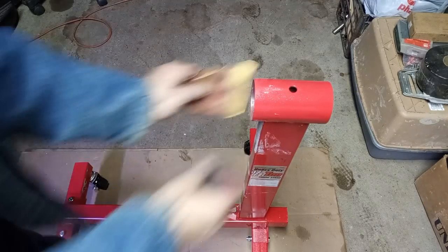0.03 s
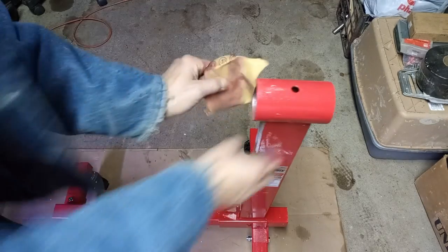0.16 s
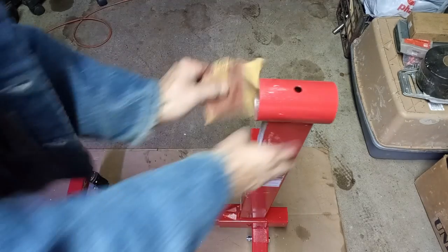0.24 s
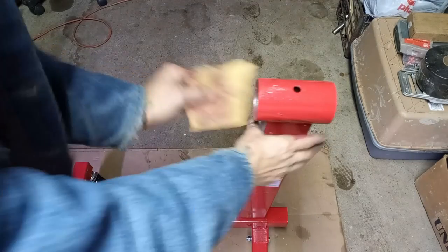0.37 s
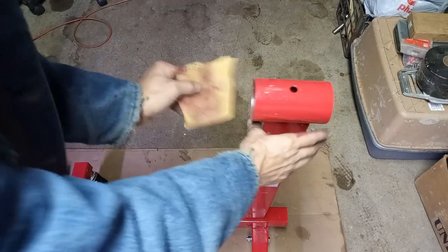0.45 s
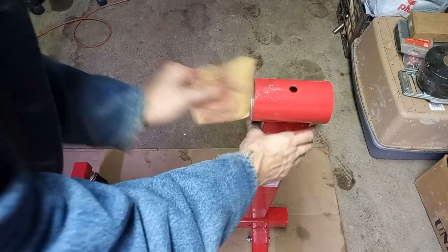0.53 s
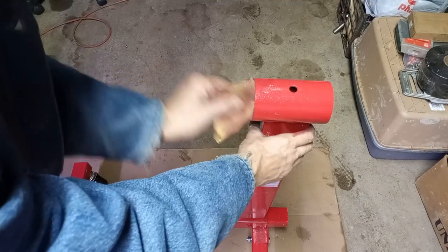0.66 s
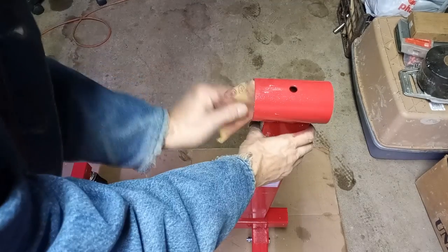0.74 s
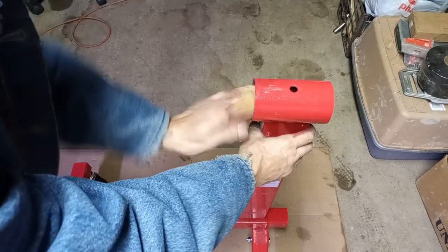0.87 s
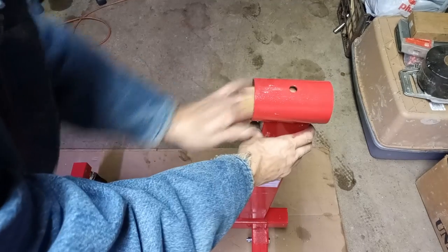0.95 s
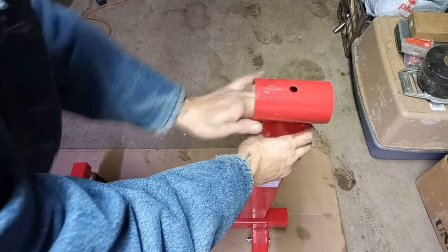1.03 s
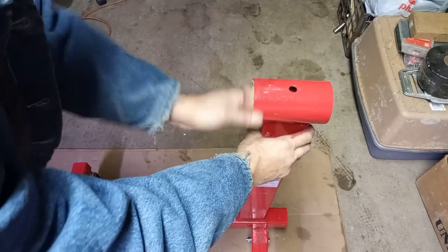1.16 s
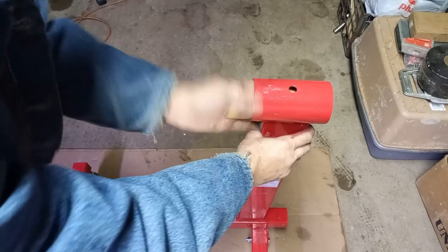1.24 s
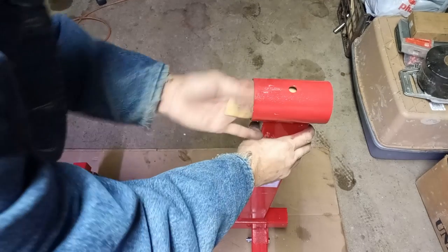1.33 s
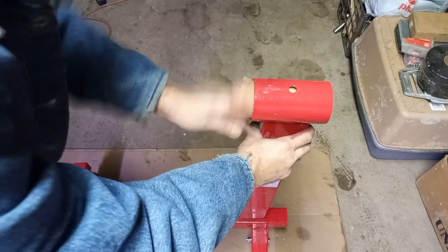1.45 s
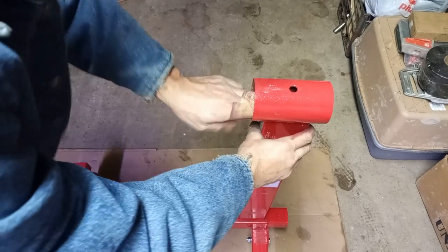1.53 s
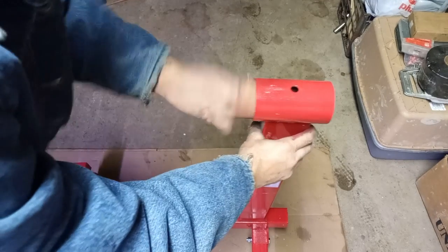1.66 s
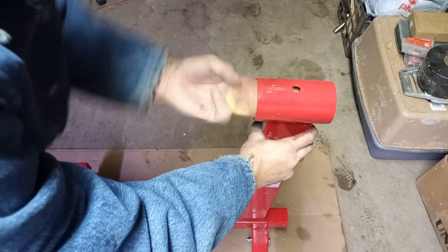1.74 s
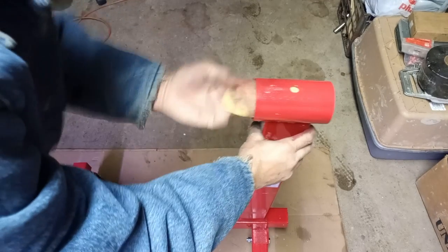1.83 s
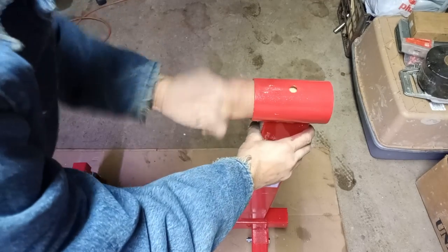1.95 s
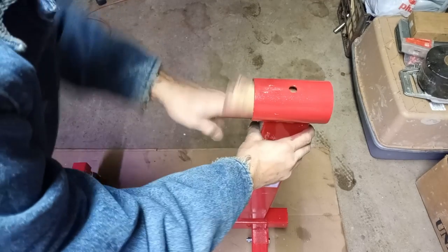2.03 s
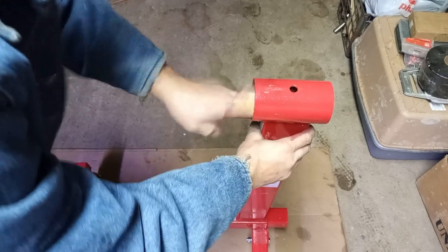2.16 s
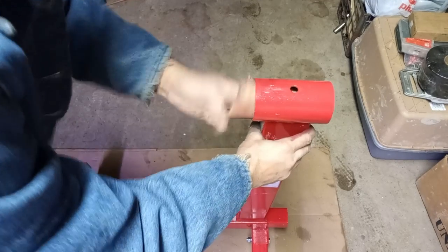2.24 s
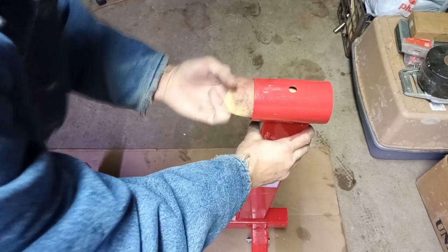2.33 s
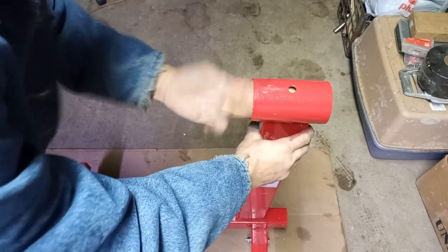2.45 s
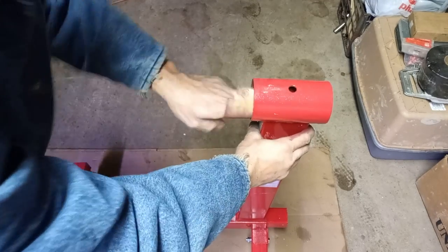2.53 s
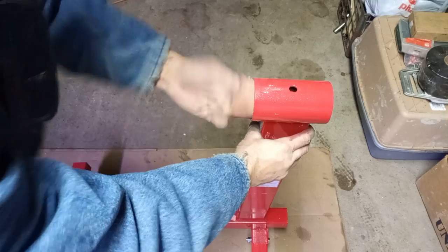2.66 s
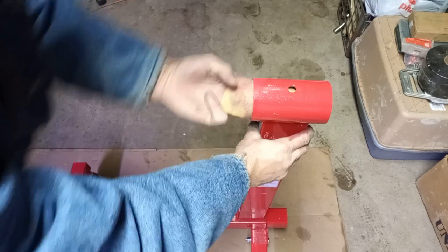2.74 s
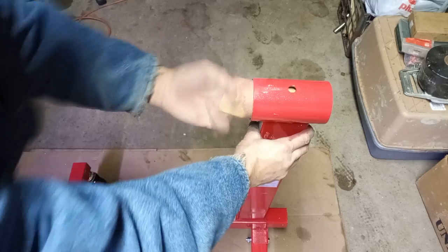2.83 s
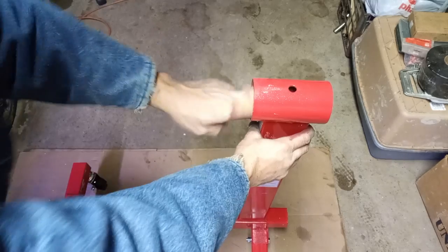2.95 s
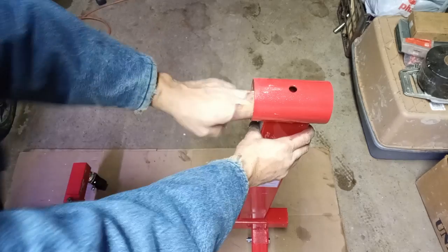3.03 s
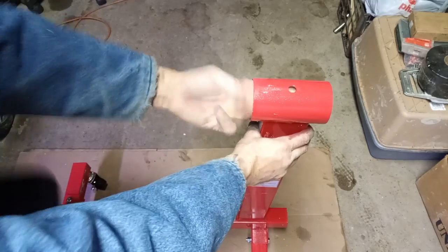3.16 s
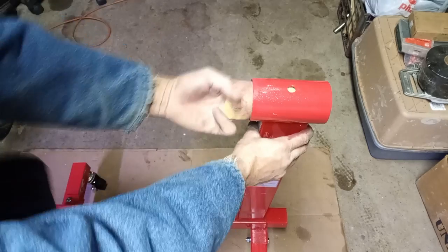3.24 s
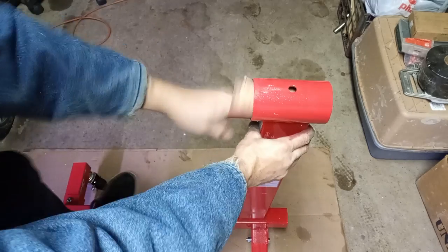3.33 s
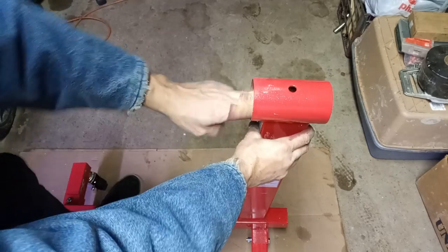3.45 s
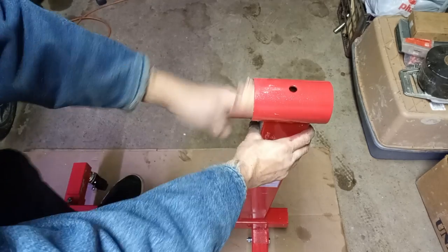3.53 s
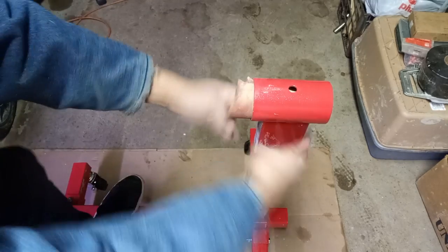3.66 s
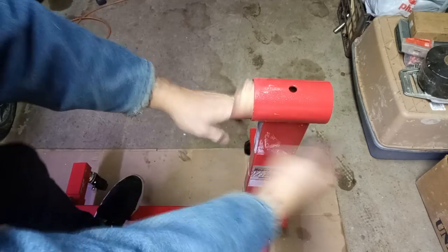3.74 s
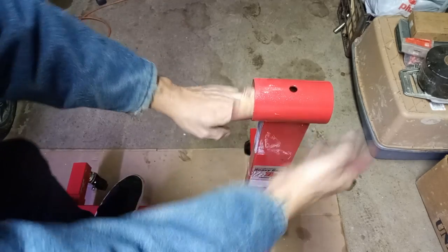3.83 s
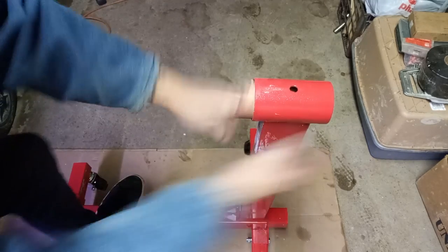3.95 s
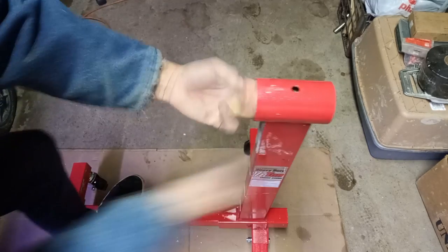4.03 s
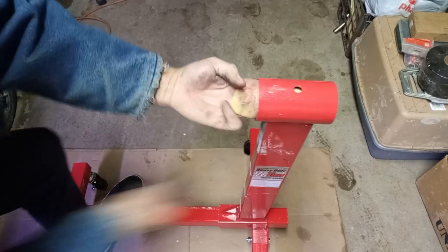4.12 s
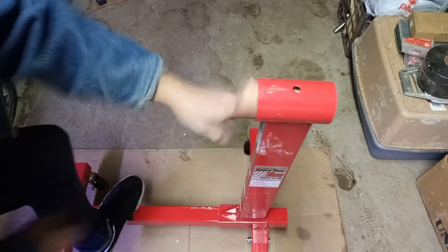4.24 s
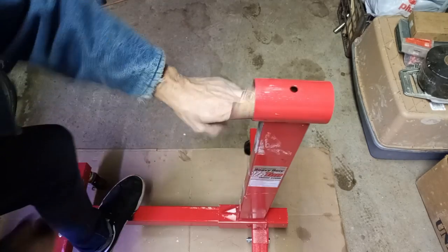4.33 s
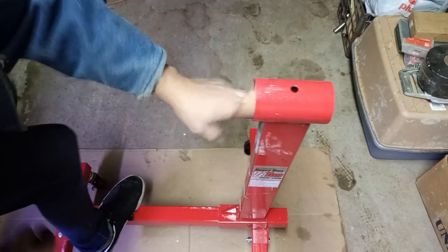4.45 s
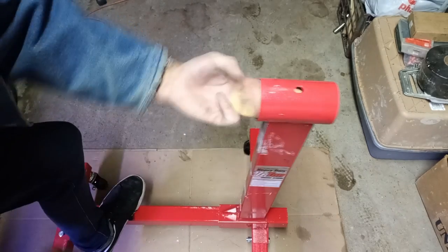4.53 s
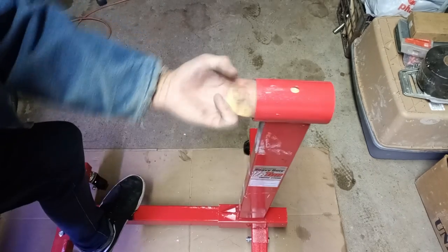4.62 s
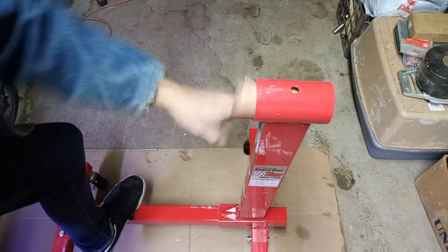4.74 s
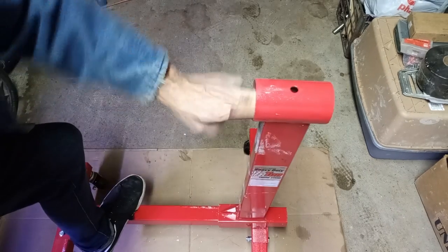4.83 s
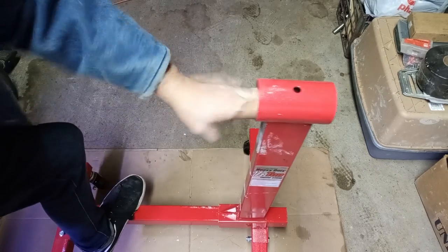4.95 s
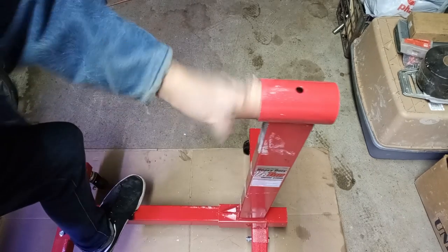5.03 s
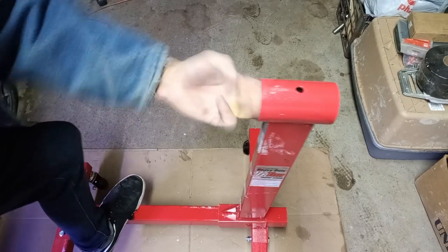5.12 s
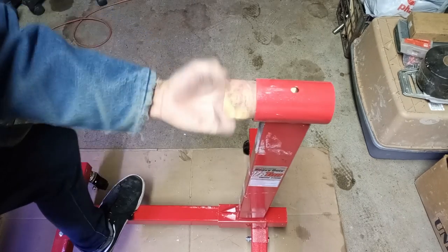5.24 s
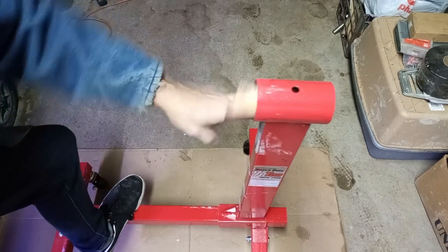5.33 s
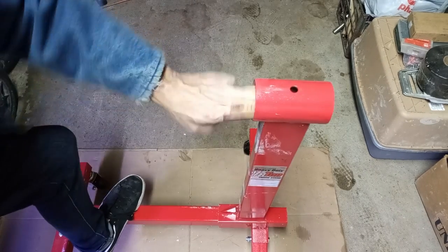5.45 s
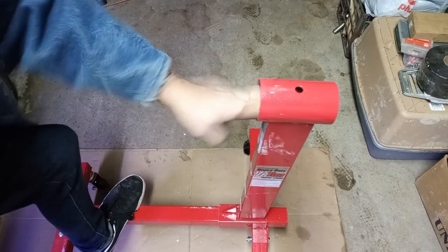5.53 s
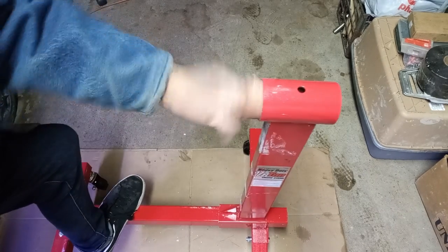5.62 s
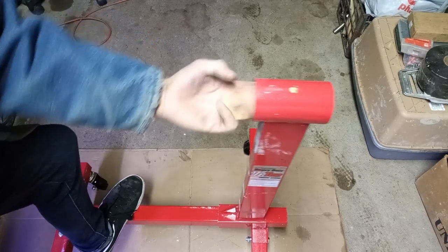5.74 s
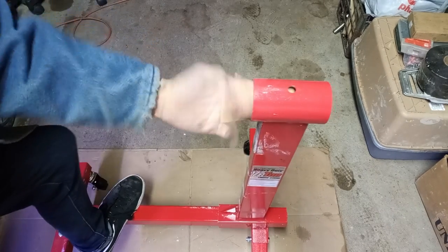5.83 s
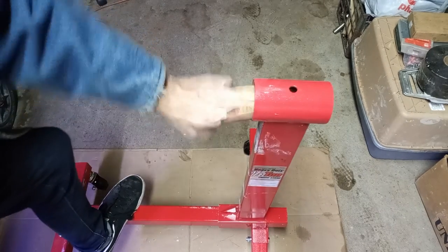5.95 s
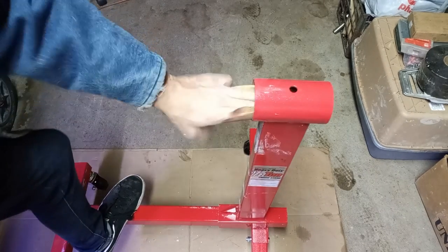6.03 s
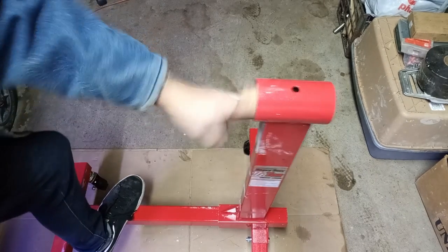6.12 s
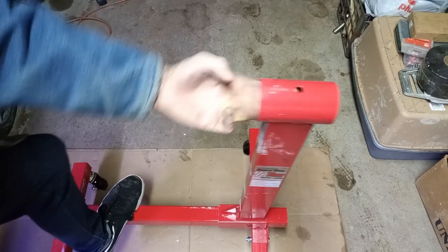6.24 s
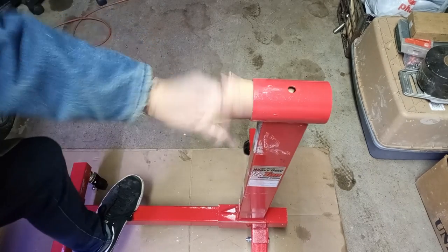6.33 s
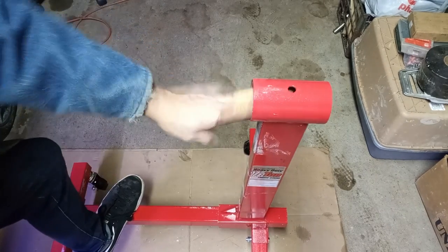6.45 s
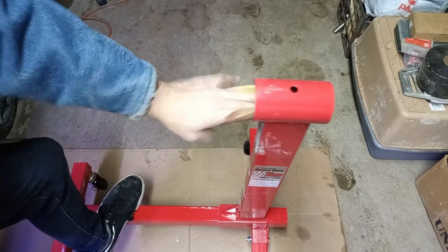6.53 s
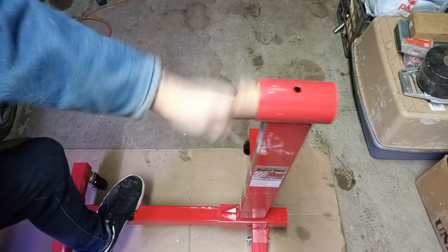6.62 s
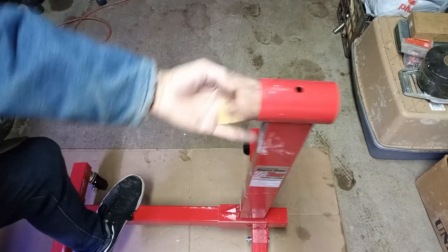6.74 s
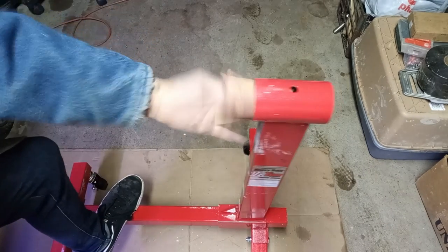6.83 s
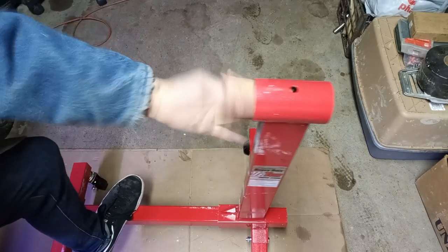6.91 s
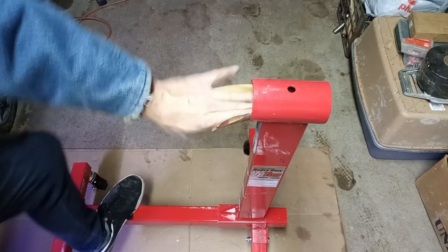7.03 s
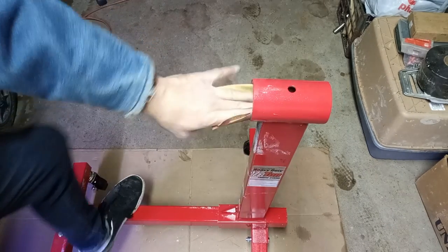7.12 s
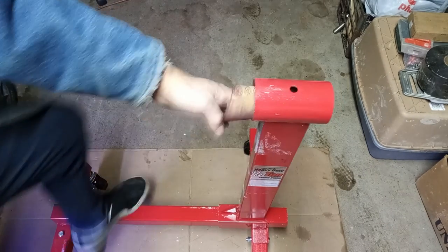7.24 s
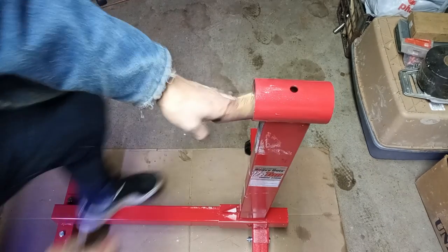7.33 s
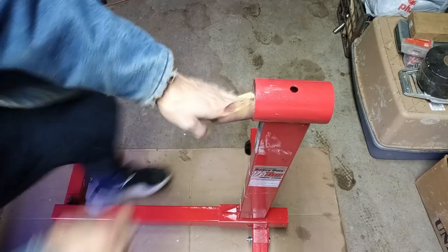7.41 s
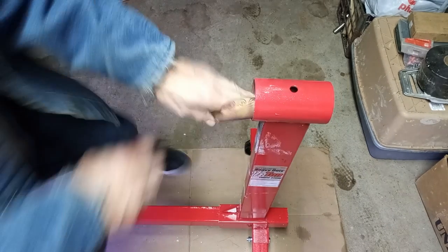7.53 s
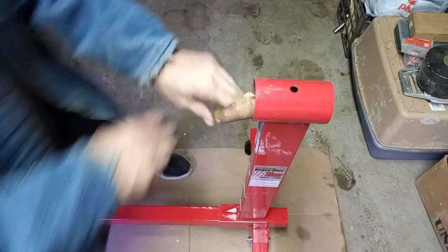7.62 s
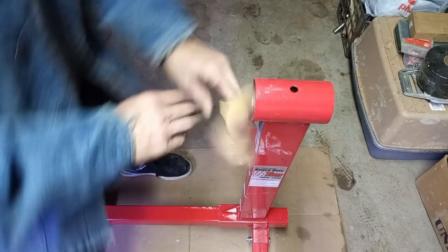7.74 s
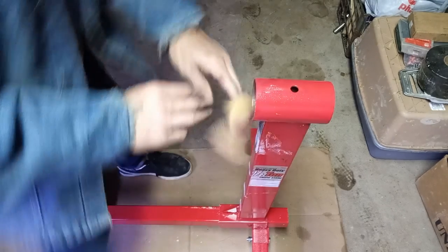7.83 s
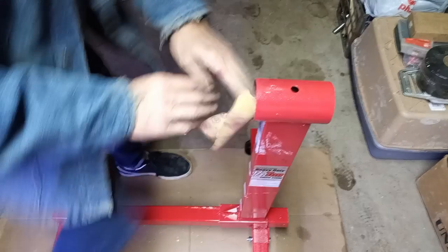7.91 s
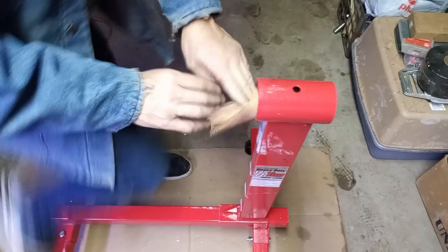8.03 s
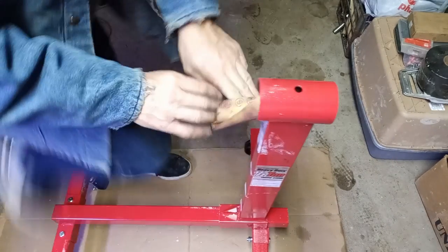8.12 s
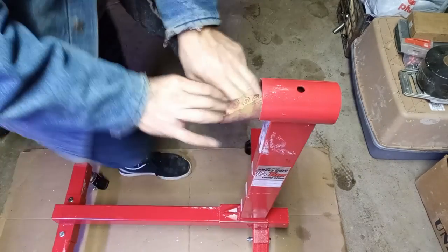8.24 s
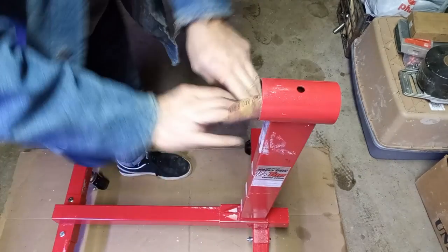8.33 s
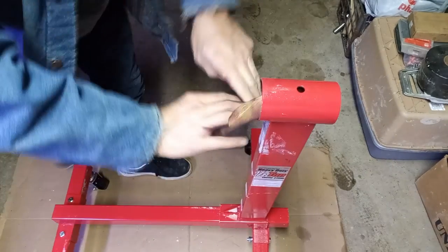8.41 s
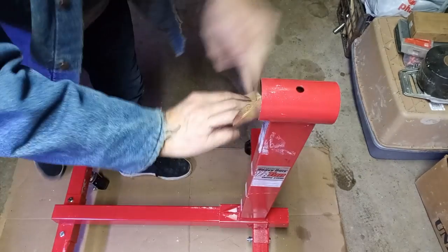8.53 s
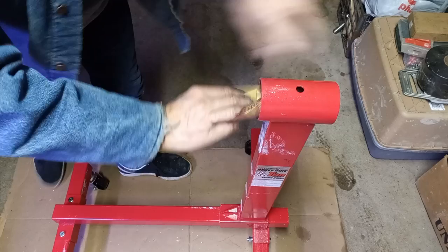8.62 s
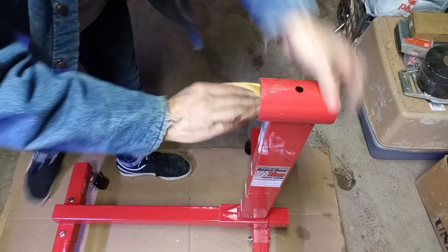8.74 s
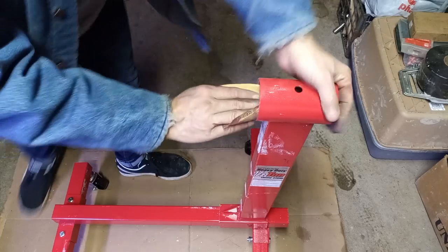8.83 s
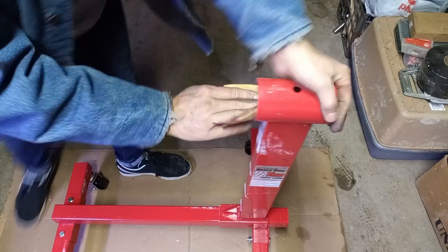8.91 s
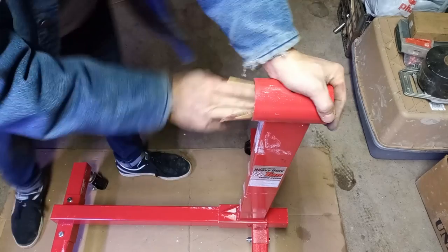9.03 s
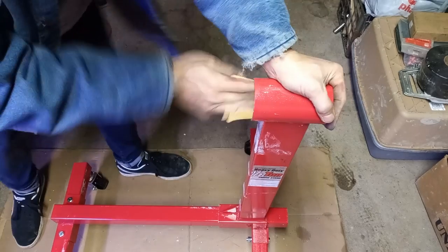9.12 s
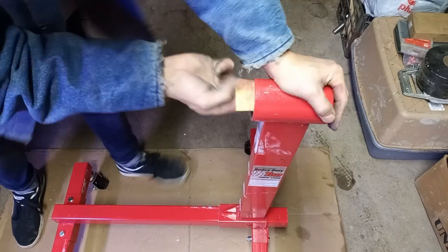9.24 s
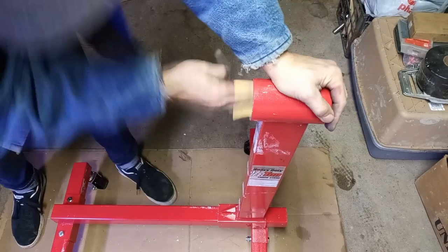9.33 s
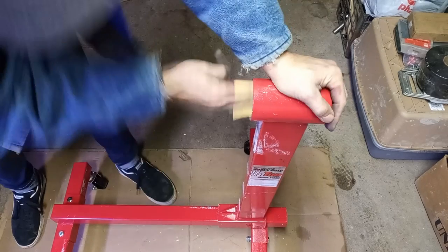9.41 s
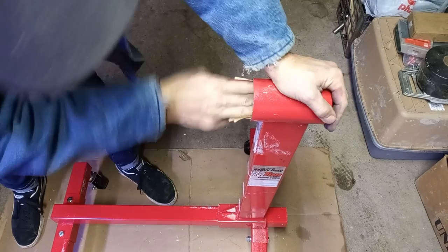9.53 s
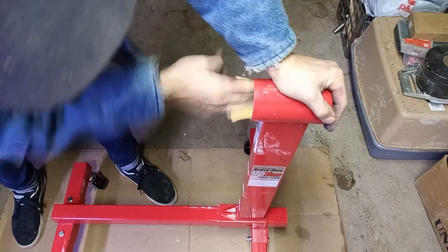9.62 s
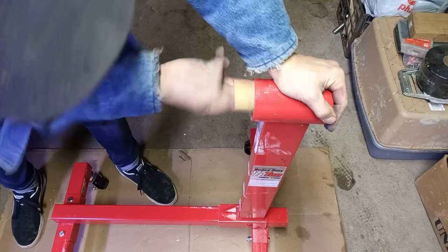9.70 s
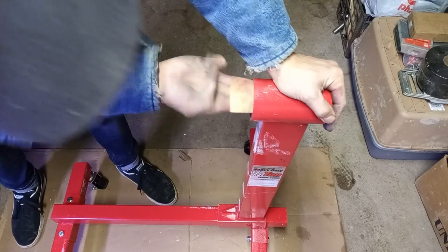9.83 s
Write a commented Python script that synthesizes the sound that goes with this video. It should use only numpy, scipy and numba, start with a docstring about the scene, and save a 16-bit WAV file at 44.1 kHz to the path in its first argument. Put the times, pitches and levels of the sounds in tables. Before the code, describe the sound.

Close up in a quiet garage, someone sands the inside of a steel tube by hand. After an opening snap, the sanding sponge rasps back and forth about four times a second, bright, gritty and slightly hollow. The rhythm breaks for uneven scuffs as the grip changes, then briefly resumes. Soft denim rustle and a faint low thrum from the stand lie underneath, all heard on the left only.

```python
"""A sharp snap and a little handling, then a sanding sponge scrubs in and out of the open steel tube on
top of a stand. Each stroke bites, pushes and fades; the grit hisses and blows the tube's air resonances.
Between a long run of strokes and a short one the sponge is folded and regripped. Denim sleeves rustle
and the stand thrums. In a garage, with one microphone close to the work, on the left channel only."""
import sys
import numpy as np
from scipy import signal
from scipy.fft import rfft, irfft, next_fast_len
from scipy.io import wavfile
from numba import njit

SR = 44100
rng = np.random.default_rng(int(sys.argv[2]) if len(sys.argv) > 2 else 0)


def to_wav(sig):
    """Store sig (one row per channel, or 1-D mono) as 16-bit WAV at the path in sys.argv[1].

    Samples outside -1..1 are clipped; the rate is SR.
    """
    pcm = np.clip(np.atleast_2d(sig), -1, 1) * 32767
    pcm = np.round(pcm).astype(np.int16)
    wavfile.write(sys.argv[1], SR, pcm.T)  # frames by channels


N = 435266
TIME = np.arange(N) / SR

# Tone of the garage's air, the denim, the grit, its sharpest grains and the close microphone.
# Each row: frequency in Hz, gain in dB.
GARAGE_SPECTRUM = [(25, -14), (100, -10), (400, -6.5), (1500, -1), (4000, -8.5), (16000, -14)]
DENIM_SPECTRUM = [(30, -30), (60, -24), (110, -8), (200, 0), (340, 10), (520, 7.5), (800, 9), (1500, 1.5),
                  (3000, -6), (7000, -29), (16000, -24)]
GRIT_SPECTRUM = [(60, -47), (300, -22), (600, -22.5), (1200, -10.5), (1800, -7), (2600, -10.5), (3100, -2),
                 (4000, 0.5), (5200, 2), (6800, 2), (9000, -3), (16000, -15.5)]
SHARP_GRIT_SPECTRUM = [(2000, -37), (5000, -35), (7000, -4.5), (9000, 0.5), (16000, 4.5)]
MICROPHONE_RESPONSE = [(20, -3), (4000, 1), (5400, 3.5), (6000, 8), (6500, 11.5), (7000, 6.5), (7700, -3),
                       (8500, -8), (10100, -1), (11500, -7), (13300, -14), (14200, -18), (14800, 2.5),
                       (16000, -16)]

# Low modes of the stand. Each row: frequency in Hz, width in Hz, gain in dB.
STAND_MODES = [(87, 12, 4.5), (125, 5.3, 1.5), (155, 26, -12.5), (205, 24, 5)]
# Hands and feet shove the stand. Each row: start and length in seconds, centre in Hz, level in dB.
STAND_SHOVES = [(0, 0.047, 90, -54), (0.094, 0.24, 213, -52), (0.247, 0.19, 123, -53),
                (0.504, 0.27, 129, -53), (0.822, 0.055, 140, -56), (0.995, 0.16, 128, -53.5),
                (1.196, 0.6, 152, -62), (1.78, 0.35, 210, -61), (2.486, 0.089, 129, -60.5),
                (2.79, 0.38, 78, -70), (3.132, 0.16, 80.5, -59), (3.15, 0.049, 169, -62),
                (3.38, 0.1, 165, -59), (3.646, 1.7, 78, -78), (5.634, 0.048, 140, -62),
                (7.548, .12, 167, -59), (9.22, 0.06, 151, -73), (9.697, 0.063, 150, -61)]
# Steady rustle of the sleeves. Each row: time in seconds, relative level in dB.
SLEEVE_LEVEL = [(0, -61.5), (.08, -53), (.13, -59.5), (.49, -67), (.55, -56), (.85, -53), (1, -67),
                (3, -60), (5.2, -63), (7, -60.5), (7.6, -62), (8.9, -60.5), (9.4, -65), (9.87, -68)]
# A sleeve swishes as the arm swings round. Each row: middle in seconds, relative level in dB.
SLEEVE_SWISHES = [(1.58, -65), (1.84, -63), (2.02, -63), (2.32, -65), (2.52, -63), (2.95, -58.5),
                  (3.21, -67), (3.41, -60.5), (3.62, -71), (3.84, -57.5), (4.1, -63.5), (4.31, -62),
                  (4.57, -59.5), (4.79, -65), (5.1, -63), (5.77, -63), (5.95, -68), (6.24, -62), (6.8, -63),
                  (6.97, -63), (7.58, -63), (8.77, -62.5), (9.25, -61), (9.76, -61.5)]
# Brief lulls in the low rustle, mostly in mid-stroke. Each entry: middle of the lull in seconds.
RUSTLE_LULLS = [1.74, 2.16, 2.39, 2.69, 3.13, 4.01, 4.46, 5.0, 6.12, 6.64, 9.11, 9.17, 9.39, 9.62]

# Snaps of the sponge and taps on the tube.
# Each row: start in seconds, peak in dB, centre and width in Hz, decay in seconds.
SNAPS_AND_TAPS = [(.056, -17.5, 2010, 2940, 0.00034), (0.068, -30, 900, 1500, .003),
                  (.068, -34, 330, 110, 0.0029), (.1098, -30, 5000, 5000, 0.00033),
                  (0.19, -37, 6000, 7000, 0.0056), (0.548, -31, 6000, 3960, 0.007),
                  (0.587, -28.5, 1300, 2500, .001), (0.772, -21.5, 1040, 300, 0.0012),
                  (0.773, -26, 5500, 5000, .0004), (1.362, -30, 6000, 3000, .0006),
                  (2.794, -30, 6000, 6000, .001), (7.502, -35, 6000, 5000, .0005),
                  (7.558, -35, 980, 300, 0.0097), (7.665, -31, 9000, 8000, .006),
                  (7.733, -29, 4930, 5000, 0.00068), (7.968, -28.5, 5900, 4000, 0.0073),
                  (8.719, -36, 6000, 5000, .006), (8.753, -24, 4500, 6000, 0.015)]
# Light contact of sponge and fingers between strokes. Each row: time in seconds, level in dB.
CONTACT_LEVEL = [(0, -51), (.13, -54.5), (.33, -74), (.5, -72), (.6, -49), (7.2, -58), (7.43, -49),
                 (7.52, -44.5), (7.6, -47), (7.9, -57), (8.07, -53), (8.3, -47.5), (8.7, -47), (8.9, -50.5),
                 (9.1, -42.5), (9.87, -73)]
# The tube's lowest air resonance, lower when hands cover the ends. Each row: time in seconds, pitch in Hz.
RIM_NOTE = [(0, 960), (.7, 1000), (1.4, 1100), (3.8, 1068), (7.1, 1020), (7.6, 1005), (8.65, 980),
            (8.88, 880), (9.15, 806), (9.87, 834)]
# Friction reaching the rim, high during a regrip at the mouth. Each row: time in seconds, share in dB.
RIM_FRICTION_SHARE = [(0, -11.5), (1, -22), (3.6, -32), (5.2, -23), (6.1, -23.5), (7.1, -21.5), (7.3, -14),
                      (8, -18), (8.5, -12), (9, -22), (9.87, -52)]
# The sponge drags on the rim. Each row: start and length in seconds, level in dB.
DRAGS = [(0.598, 0.15, -38.5), (0.748, 0.061, -37.5), (0.8, 0.21, -42.5), (1.12, .12, -52),
         (1.266, 0.055, -47.5), (1.403, 0.14, -49.5), (2.13, 0.074, -51), (2.462, 0.056, -46),
         (2.916, 0.077, -52.5), (3.726, 0.13, -44.5), (4.23, 0.14, -47), (4.742, 0.078, -43.5),
         (5.297, 0.14, -45.5), (5.756, 0.033, -47), (6.15, .06, -50), (8.54, 0.15, -47), (8.74, 0.17, -51)]
# The sponge chatters and one band sings. Each row: start and length in seconds, pitch in Hz, level in dB.
SPONGE_CHATTERS = [(1.11, 0.11, 2230, -42.5), (3.953, 0.1, 1800, -40.5), (4.874, 0.099, 1970, -48),
                   (5.753, 0.032, 2000, -39), (5.814, 0.11, 4550, -45), (6.056, 0.053, 2190, -37.5),
                   (6.282, 0.049, 1950, -40.5), (6.787, 0.028, 2170, -38), (8.1, 0.53, 2780, -65),
                   (8.826, 0.21, 2730, -51), (9.12, 0.11, 1800, -46), (9.778, 0.031, 2300, -39)]

# The tube's higher air resonances. Each row: frequency in Hz, width in Hz, gain in dB.
AIR_MODES = [(1710, 330, -0.5), (1907, 100, 2.5), (2210, 120, -4), (2600, 220, 6), (3820, 320, 0.5),
             (4550, 550, -1.5)]
# How loudly those resonances ring over time. Each row: time in seconds, gain in dB.
AIR_MODE_GAIN = [(0, -4), (1.2, -0.5), (3.4, 0), (4.6, -1.5), (6.6, 0), (7.1, -3), (8.5, 0), (9.1, -5),
                 (9.87, -1.5)]
# The highest treble of the grit. Each row: time in seconds, gain in dB.
GRIT_TREBLE = [(0, -.5), (1.5, 1), (3.2, .5), (4.2, 1.5), (5.2, 1), (6.5, 1.8), (7.7, 1.5), (9.2, 3.5),
               (9.87, 1.5)]
# Brief brushes as the sponge is folded and regripped.
# Each row: start, bite and push in seconds, level in dB, sag over the push in dB.
REGRIP_BRUSHES = [(.185, 0.0062, .015, -37.5, 2), (0.526, .029, 0.064, -36.5, 19),
                  (7.242, 0.021, 0.11, -35, 12), (7.633, .007, 0.045, -39, -2.5),
                  (7.78, 0.057, .05, -32.5, 9), (7.913, 0.016, 0.096, -39.5, 2.5),
                  (8.091, 0.026, 0.036, -38, 3.5), (8.4, .035, 0.047, -43.5, -4),
                  (8.541, 0.011, .07, -37, 12), (8.613, 0.028, 0.064, -28, 21),
                  (8.749, .0033, 0.2, -35.5, 14.5)]
# Strokes through the tube. Each row: start, bite and push in seconds, level in dB,
# sag over the push in dB, hollow note in Hz, its share at mid-push in dB.
SANDING_STROKES = [(0.579, 0.076, 0.25, -36, 0.7, 1890, -10), (0.819, 0.038, 0.18, -32.5, 0.8, 1940, -8.5),
                   (1.063, 0.032, 0.2, -33, -2.8, 1880, -7.5), (1.358, 0.0045, 0.15, -32.5, -1, 1790, -24),
                   (1.598, 0.01, 0.16, -31.5, -1.2, 1990, -9.5),
                   (1.853, 0.018, 0.18, -31.5, 0.6, 1870, -11.5), (2.093, 0.02, 0.181, -32, -1.5, 1830, -7),
                   (2.34, 0.026, 0.16, -32, 0.3, 1940, -16), (2.55, 0.064, 0.18, -27, 8, 1910, -6.5),
                   (2.778, 0.028, 0.16, -33, -1, 1690, -13), (3.013, 0.047, 0.15, -27.5, 4.5, 1770, -6),
                   (3.251, 0.014, 0.14, -33.5, -3.5, 1750, -11),
                   (3.478, 0.039, 0.097, -30.5, -1, 1730, -10), (3.681, 0.013, 0.15, -33, 4.5, 2290, -7),
                   (3.9, 0.041, 0.13, -30, 1.5, 1930, -20), (4.141, 0.023, 0.14, -33.5, -3, 2190, -14),
                   (4.36, 0.022, 0.15, -29, 3.5, 2140, -14), (4.613, 0.011, 0.18, -31.5, 2, 2460, -26),
                   (4.885, 0.041, 0.23, -28.5, 7.5, 2090, -11.5),
                   (5.188, 0.019, 0.19, -32.5, -0.5, 2340, -11),
                   (5.472, 0.055, 0.2, -30.5, 2.5, 2080, -12.5), (5.749, 0.039, 0.19, -32, 1.2, 2400, -13),
                   (6.009, 0.052, 0.17, -29, 4, 2220, -12.5), (6.285, 0.035, 0.17, -32.5, 0.1, 2440, -11),
                   (6.547, 0.057, 0.18, -28, 7, 2300, -13.5), (6.782, 0.024, 0.16, -34.5, -4, 2620, -9),
                   (7.047, 0.04, 0.11, -34.0, -2.5, 2040, -9),
                   (8.956, 0.095, 0.25, -34.5, -3.5, 1870, -12.5),
                   (9.309, 0.013, 0.16, -33, 0.5, 2040, -11.5), (9.536, 0.023, 0.22, -29, 9.8, 2070, -10),
                   (9.78, 0.021, 0.25, -30.1, 8.0, 2300, -16)]


def undb(db):
    """Decibels to gain."""
    return 10 ** (np.asarray(db) / 20)


def unit(x):
    """Scale to rms 1."""
    return x / np.sqrt(np.mean(x ** 2))


def curve(rows):
    """Join (seconds, value) rows with straight lines, at every sample."""
    seconds, values = np.transpose(rows)
    return np.interp(TIME, seconds, values)


def swell(start, length):
    """A rounded burst, 0 outside its span."""
    return np.sin(np.pi * np.clip((TIME - start) / length, 0, 1)) ** .5


def bell(middle, half_width_s):
    """A bell curve of height 1 around a moment."""
    return np.exp(-np.minimum(((TIME - middle) / half_width_s) ** 2, 20))


def wander(per_s):
    """Random wandering with rms 1."""
    knots = rng.standard_normal(N // 10)
    return unit(np.interp(TIME * per_s, np.arange(len(knots)), knots))


def grains(per_s, spread_db):
    """Tiny random clicks of unequal size and either sign, rms 1."""
    hit = rng.random(N) < per_s / SR
    size = undb(spread_db * np.minimum(rng.exponential(size=N), 4))
    return unit(hit * size * np.sign(rng.standard_normal(N)))


def colour(x, points):
    """Causal filter whose gain follows (Hz, dB) points."""
    size = next_fast_len(len(x) + SR // 10, True)
    size += size % 2
    hz, db = np.transpose(points)
    bin_hz = np.arange(size // 2 + 1) * SR / size
    gain = undb(np.interp(np.log(bin_hz + 1), np.log(hz), db))
    cepstrum = irfft(np.log(gain))
    cepstrum[1:size // 2] *= 2  # fold onto positive time for minimum phase
    cepstrum[size // 2 + 1:] = 0
    return irfft(rfft(x, size) * np.exp(rfft(cepstrum)))[:len(x)]


@njit
def state_variable(x, tuning, damping):
    """Band-pass whose centre and width may move every sample."""
    y, band_state, low_state = np.empty(len(x)), 0., 0.
    for i in range(len(x)):
        g = tuning[i]
        band = (band_state + g * (x[i] + 1e-18 - low_state)) / (1 + g * (g + damping[i]))
        band_state = 2 * band - band_state
        low_state += 2 * g * band
        y[i] = damping[i] * band
    return y


def resonate(x, hz, *widths_hz):
    """A resonance with gain 1 at its centre; a second width steepens its skirts."""
    hz = hz * np.ones(len(x))
    for width in widths_hz:
        x = state_variable(x, np.tan(np.pi * hz / SR), width / hz)
    return x


def rub(start, bite, push, db, sag_db, fade_db_per_s, rounding_s):
    """One rub bites, sags through the push and fades as the hand slows: its span, progress and force."""
    span = slice(int(start * SR), int(start * SR) + SR // 2)
    age = TIME[span] - start
    progress = np.minimum(age / push, 1)
    grip = .5 + .5 * np.tanh(2.9 * (age / bite - .45))
    slowing_s = rounding_s * np.logaddexp(0, (age - push) / rounding_s)
    return span, progress, grip * undb(db - sag_db * progress - fade_db_per_s * slowing_s)


def arm_motion():
    """All strokes and brushes as three curves: friction, drive of the hollow note, and its pitch."""
    stroke_ending = dict(fade_db_per_s=230, rounding_s=0.021)
    brush_ending = dict(fade_db_per_s=204, rounding_s=0.004)  # a brush lifts off more abruptly
    brush_hz, brush_share_db, hollow_sag_db = 2110, -15.5, 4
    rubs = [(*row, stroke_ending) for row in SANDING_STROKES]
    rubs += [(*row, brush_hz, brush_share_db, brush_ending) for row in REGRIP_BRUSHES]
    friction_power, hollow_power, pitch = np.zeros(N), np.zeros(N), []
    for start, bite, push, db, sag_db, hz, share_db, ending in rubs:
        span, progress, force = rub(start, bite, push, db, sag_db, **ending)
        share = undb(share_db - hollow_sag_db * (progress - .5))
        friction_power[span] += force ** 2
        hollow_power[span] += (force * share) ** 2
        pitch += [(start + bite, hz), (start + push, hz)]
    return np.sqrt(friction_power), np.sqrt(hollow_power), curve(sorted(pitch))


def room_tone():
    """The faint, steady air of the garage."""
    return unit(colour(rng.standard_normal(N), GARAGE_SPECTRUM)) * undb(-57.5)


def garage_echoes(x, t60_s, early_db, tail_db):
    """Floor and boxes return a few quick echoes; the walls add a short tail."""
    age = TIME[:SR // 2]
    early = np.zeros(len(age))
    lags = rng.integers(SR // 500, SR // 60, size=12)
    early[lags] = rng.choice([-1, 1], size=12) / np.sqrt(lags)
    build_up = np.minimum(age / 0.017, 1)
    tail = rng.standard_normal(len(age)) * undb(-60 * age / t60_s) * build_up
    echoes = undb(early_db) * early / np.linalg.norm(early) + undb(tail_db) * tail / np.linalg.norm(tail)
    echoes = colour(echoes, [(300, -9.5), (2000, 2.0), (6000, 0), (14000, -11.5)])
    return signal.fftconvolve(x, echoes)[:N]


def stand_thrum():
    """The steadying hand and the feet shake the stand's low modes."""
    judder = grains(per_s=830, spread_db=6)
    ring = sum(undb(db) * resonate(judder, hz, width) for hz, width, db in STAND_MODES)
    out = np.zeros(N)
    for start, length, hz, db in STAND_SHOVES:
        thrum = swell(start, length) * resonate(ring, hz, 0.3 * hz)
        out += undb(db) * unit(thrum) * np.sqrt(length * SR / N)  # db is the rms over the shove
    return out


def sleeves(friction):
    """Denim rustles and flaps: more as the arm swings round, less in a push, and with brief lulls."""
    rustle = unit(colour(grains(per_s=2500, spread_db=3), DENIM_SPECTRUM))
    flaps = unit(resonate(resonate(rng.standard_normal(N), 153, 127), 140, 210))
    flaps *= undb(-15 + 2.8 * wander(11))
    pushing = friction / (friction + undb(-15.5))
    lulls = sum(bell(middle, half_width_s=0.033) for middle in RUSTLE_LULLS)
    quieting_db = 12 * pushing + 15 * lulls
    steady = undb(curve(SLEEVE_LEVEL) + 5.5 - quieting_db + 2.2 * wander(14))
    swishes = sum(undb(db + 8) * bell(middle, half_width_s=0.036) for middle, db in SLEEVE_SWISHES)
    return (rustle + flaps) * np.hypot(steady, swishes)


def crinkles(friction):
    """The stiff abrasive face crackles as the fingers bend it."""
    bending = np.hypot(undb(curve(CONTACT_LEVEL) - 5), friction * undb(-23))
    return bending * resonate(grains(per_s=160, spread_db=-2), 12700, 14000)


def taps():
    """Each snap or tap is a sharp contact with a short scuff behind it, through one resonance."""
    out = np.zeros(N)
    age = TIME[:SR // 10]
    for start, db, hz, width, decay in SNAPS_AND_TAPS:
        force = 3.6 * rng.standard_normal(len(age)) * np.exp(-age / decay)
        force[0] = 2  # the contact itself
        tap = resonate(force, hz, width)
        first = int(start * SR)
        out[first:first + len(age)] += undb(db) * tap / np.abs(tap).max()
    return out


def rim_judder(friction):
    """The sponge judders over the rim and rings the lowest air resonance, loudest when it drags."""
    hz = curve(RIM_NOTE) * (1 + 0.008 * wander(10))
    ring = unit(resonate(grains(per_s=1200, spread_db=1), hz, 117, 1050))
    first_stroke_s = SANDING_STROKES[0][0]
    light_touch = undb(-62) * (TIME > first_stroke_s)
    rubbing = np.hypot(light_touch, undb(curve(RIM_FRICTION_SHARE)) * friction) * undb(2 * wander(20))
    drags = sum(undb(db) * swell(start, length) for start, length, db in DRAGS)
    return ring * np.hypot(rubbing, drags)


def chatters():
    """Quick slips of the sponge make a narrow, rough band sing for a moment."""
    slips = grains(per_s=3000, spread_db=-2)
    return sum(undb(db) * swell(start, length) * unit(resonate(slips, hz, 400, 1050))
               for start, length, hz, db in SPONGE_CHATTERS)


def tube_air(rubbing, hollow_hz):
    """The air resonances drift together as the sponge slides; each swells and fades under the fingers."""
    rest_hz = 2010
    shift = (hollow_hz / rest_hz) ** 0.21 * (1 + 0.025 * wander(7))
    air = np.zeros(N)
    for hz, width, db in AIR_MODES:
        ring = resonate(rubbing * rng.standard_normal(N), hz * shift, width, 1600)
        air += undb(db + 4.3 * wander(11)) * ring
    return air * undb(curve(AIR_MODE_GAIN))


def hollow_note(hollow_hz):
    """The sliding sponge changes the air column, so the tube's hollow note wanders."""
    hz = hollow_hz * (1 + 0.056 * wander(12))
    return unit(resonate(grains(per_s=8000, spread_db=3.5), hz, 520, 1300))


def grit_hiss(friction, rubbing, contact):
    """Grit scratches steel, brighter under a faster hand; the sharpest grains skip in and out of touch."""
    scratch = rubbing * grains(per_s=15000, spread_db=2.5)
    scratch += contact * grains(per_s=3500, spread_db=-5)
    speed = friction / (friction + undb(-29))
    bright_db = curve(GRIT_TREBLE) + 8 * (speed - .55) + 0.88 * wander(70) + 2.3 * wander(18)
    sharp = np.hypot(rubbing, contact) * undb(bright_db) * grains(per_s=7000, spread_db=1)
    return colour(scratch, GRIT_SPECTRUM) + colour(sharp, SHARP_GRIT_SPECTRUM)


def sanding(friction, hollow_drive, hollow_hz):
    """The sponge moves in quick catches and slips, which drive both the hiss and the air in the tube."""
    catching = unit(undb(0.61 * wander(260) + 0.16 * wander(55)))
    rubbing = friction * catching
    contact = undb(curve(CONTACT_LEVEL) + 2.1 * wander(35))
    hiss = grit_hiss(friction, rubbing, contact)
    note = hollow_drive * catching * hollow_note(hollow_hz)
    air = tube_air(np.hypot(rubbing, contact), hollow_hz)
    return undb(-0.5) * hiss + undb(-3) * (air + note)


def scene():
    """The work at the stand from close by, with the garage's echoes and faint air behind it."""
    background = room_tone()
    friction, hollow_drive, hollow_hz = arm_motion()
    sponge = sanding(friction, hollow_drive, hollow_hz) + chatters() + rim_judder(friction)
    work = sponge + crinkles(friction) + sleeves(friction) + stand_thrum() + taps()
    echoes = garage_echoes(work, t60_s=0.76, early_db=-9.5, tail_db=-12)
    return (work + echoes + background)[None]


def record(dry):
    """One small, close microphone with a bright, peaky treble feeds the left; the right is silent."""
    top_hz = 15950
    low_pass = signal.ellip(12, .2, 80, top_hz, fs=SR, output="sos")
    left = undb(6) * colour(dry[0], MICROPHONE_RESPONSE)
    return np.array([signal.sosfilt(low_pass, left), np.zeros(N)])


dry = scene()
out = record(dry)
to_wav(out)
```